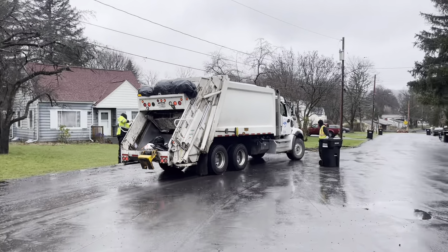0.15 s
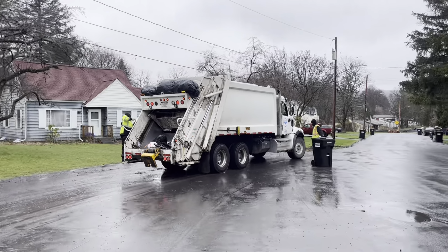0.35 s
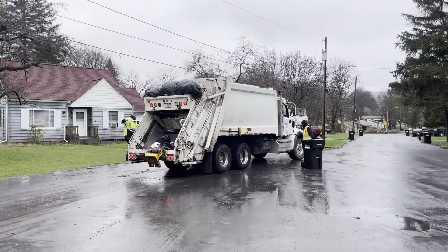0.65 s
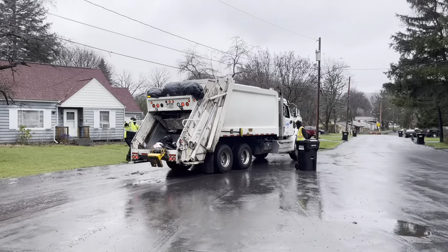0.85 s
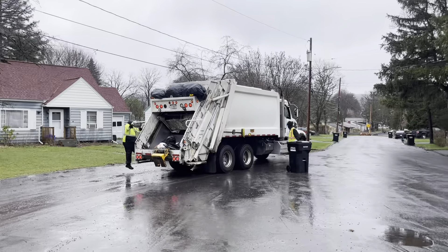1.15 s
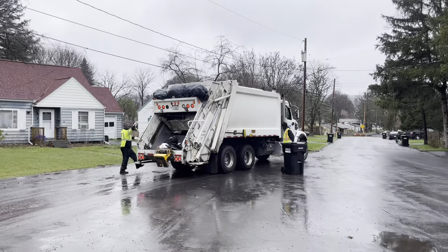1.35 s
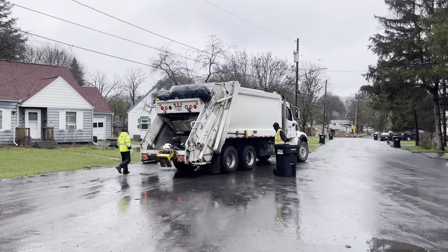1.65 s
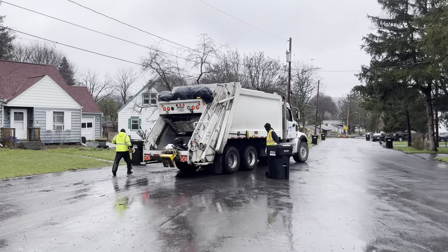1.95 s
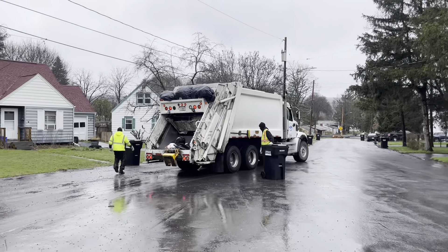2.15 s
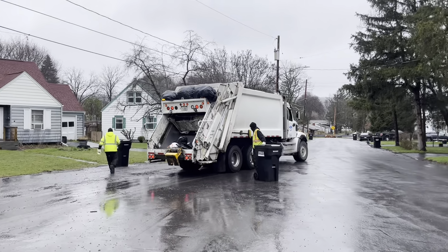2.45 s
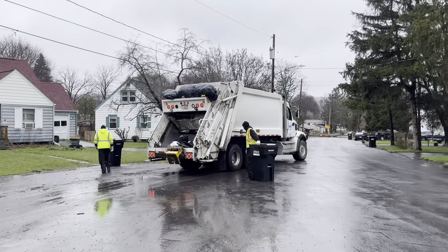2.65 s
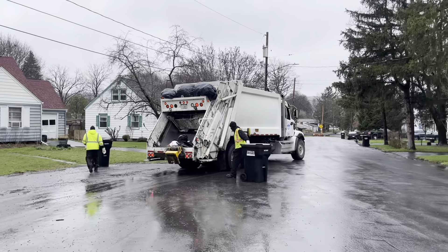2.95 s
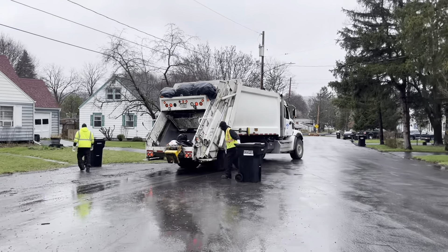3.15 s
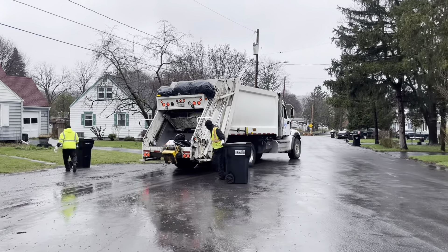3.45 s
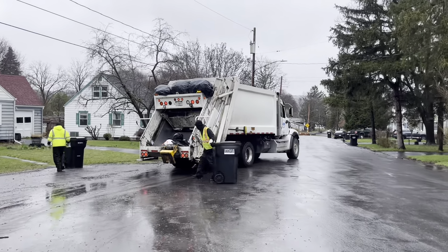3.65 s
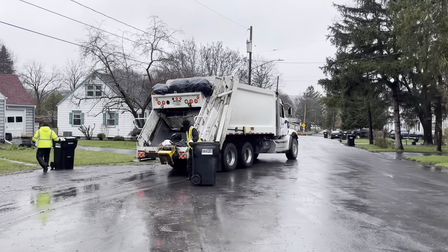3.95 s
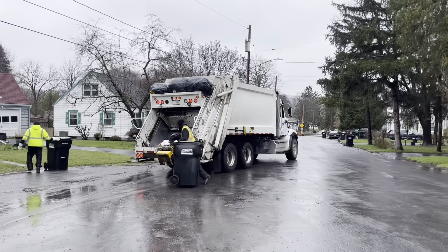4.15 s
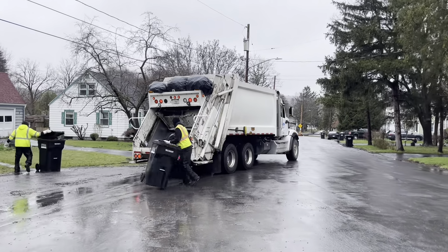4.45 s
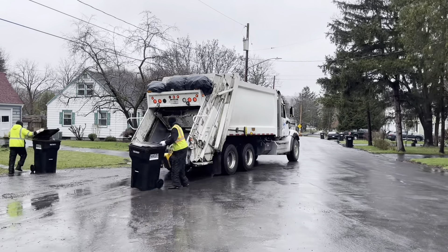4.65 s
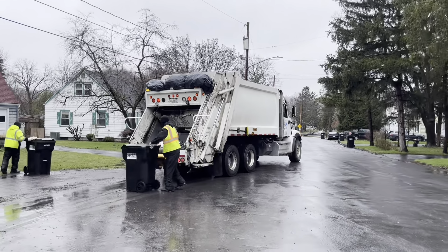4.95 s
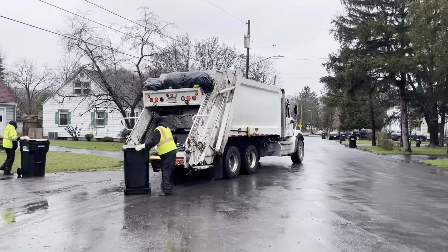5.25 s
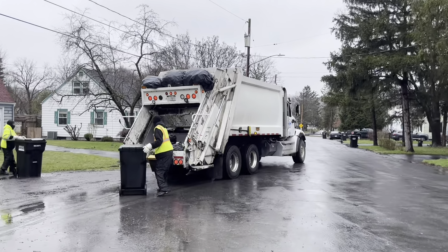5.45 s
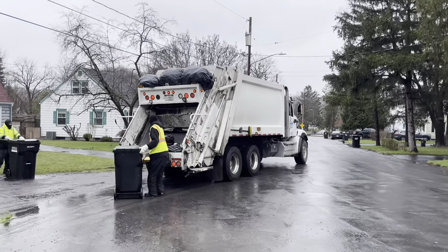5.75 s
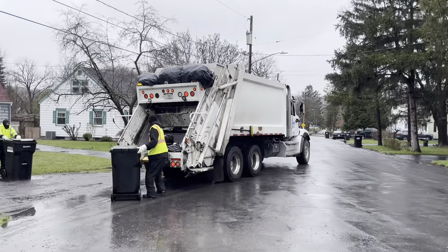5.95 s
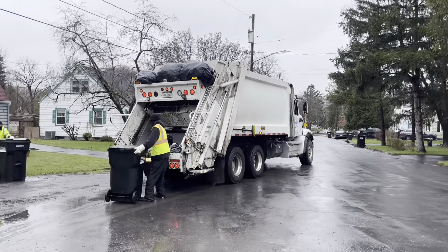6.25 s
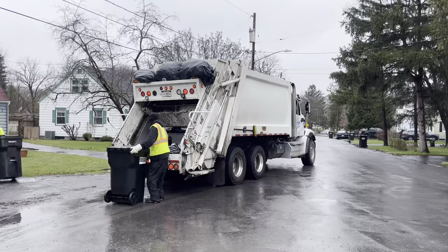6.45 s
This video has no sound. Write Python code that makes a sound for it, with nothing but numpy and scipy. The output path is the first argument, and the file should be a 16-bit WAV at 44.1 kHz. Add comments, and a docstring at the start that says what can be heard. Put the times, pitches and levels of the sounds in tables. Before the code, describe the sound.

High metallic brake squeals grow piercing over a low diesel clatter, give way to hollow plastic bin thuds, and end in a fading burst of air.

```python
"""Garbage truck squealing to a halt

A rear-loader creeps along a wet street, its diesel winding down to idle and its drum brakes squealing until it stops.
A wheeled bin rolls up on filtered grit and lands with hollow ringing knocks; a shaped hiss is the parking brake's air.
Firing bursts drive the engine's resonances, and wobbling tones make the squeals.
Low noise is a breeze buffeting a hand-held pair of closely spaced microphones."""
import sys
import numpy as np
from scipy import signal
from scipy.fft import rfft, irfft, next_fast_len
from scipy.io import wavfile
from scipy.ndimage import uniform_filter1d

SR = 44100
rng = np.random.default_rng(int(sys.argv[2]) if len(sys.argv) > 2 else 0)


def inscribe(sig):
    """Save sig as 16-bit PCM at rate SR to the path in sys.argv[1].

    A 1-D sig is mono; a 2-D sig holds one channel per row.
    Samples are clipped to [-1, 1] before scaling.
    """
    pcm = np.round(np.clip(np.atleast_2d(sig).T, -1, 1) * 32767)
    wavfile.write(sys.argv[1], SR, pcm.astype(np.int16))


N = 291942
TIME = np.arange(N) / SR

# All levels are relative: the sources trim them further. Colours are filter gains.
# breeze on the microphones: time_s, level_db
WIND_LEVEL = [(0.0, -28), (1.3, -29.5), (1.7, -23), (1.92, -29), (2.1, -32.5), (2.35, -44), (2.75, -51),
              (3.1, -39), (4.2, -33), (4.6, -29), (4.95, -23.5), (5.45, -26), (5.72, -33.5), (6.18, -31),
              (6.62, -31.5)]
# breeze colour: pitch_hz, gain_db
WIND_TONE = [(20, -42), (32, -18), (50, -5), (80, 2.5), (140, -2), (205, -6.5), (300, -12.5), (600, -24),
             (1000, -74)]

# wheels on asphalt: time_s, rumble_db
ROLL_LEVEL = [(0, -28), (0.7, -35.5), (2.5, -37.5), (3.3, -33.5), (3.62, -25.5), (4.12, -25), (4.28, -30.5),
              (4.55, -26.5), (4.8, -26.5), (5.5, -27), (6.62, -29)]
# rumble colour: pitch_hz, gain_db
ROLL_TONE = [(40, -42), (70, -28), (130, -2.5), (250, 0), (390, 2), (520, 1), (660, -6.5), (760, -9),
             (1000, -12.5), (1200, -18.5), (1700, -16.5), (2400, -63)]
# wet grit colour: pitch_hz, gain_db
GRIT_TONE = [(600, -8), (1100, 11), (2000, 4.5), (4500, -4.5), (6500, -1.5), (9000, -0.5), (13000, -9),
             (15500, -13)]
# louder grit where the bin is swung or dragged: top_s, half_width_s, level_db
GRIT_SCRAPES = [(3.25, 0.16, -41), (4.64, 0.2, -34.5), (4.97, 0.056, -33)]
GRIT_DB = -46  # steady crunch under the scrapes

# diesel clatter: time_s, level_db
CLATTER_LEVEL = [(0.0, -38), (0.6, -38), (2.0, -43.5), (3.2, -43.5), (3.6, -40), (5.4, -40)]
# clatter colour: pitch_hz, gain_db
CLATTER_TONE = [(25, -25), (60, 8), (200, -6), (400, -7), (600, -8.5), (740, -9.5), (1150, -14.5),
                (1600, -19.5), (2200, -16.5), (3900, -17.5), (6000, -25), (9000, -53)]
# panels and pipes that the engine sets ringing: pitch_hz, width_hz, level_db
BODY_RESONANCES = [(355, 100, 5.5), (554, 99, 9), (948, 166, 11.5), (1368, 130, 13.5), (1767, 58, 10)]
# diesel winding down to idle: time_s, firings_per_s
FIRING_RATE = [(0, 46), (0.2, 44), (0.5, 39.5), (0.9, 36.6), (2.0, 35.2)]
# exhaust note: multiple of the firing rate, level_db
EXHAUST_ORDERS = [(2, -4), (3, 0), (4, -1), (5, -1), (6, -8), (7, -9), (8, -11), (10, -4), (12, -7)]
# louder exhaust while the engine still turns fast: top_s, half_width_s, level_db
EXHAUST_SWELLS = [(0.25, 0.35, -34)]
EXHAUST_IDLE_DB = -49.5
# whine coming forward as the engine nears idle: top_s, half_width_s, level_db
ENGINE_WHINE_SWELLS = [(1.12, 0.22, -42)]
WHINE_ORDER, WHINE_DB = 10, -48  # multiple of the firing rate, steady level
# low hums and groans of the slowing truck: top_s, half_length_s, pitch_hz, level_db
TRUCK_HUMS = [(1.83, 0.073, 86.2, -28.5), (2.07, 0.074, 205, -33.5), (3.39, 0.36, 136.3, -29.5)]

# dull low thumps: start_s, level_db, pitch_hz, t60_s
LOW_THUMPS = [(1.096, 6, 85, 0.028), (1.487, 3.5, 71, 0.043), (1.597, -1, 85, 0.036),
              (4.36, -10.5, 100, 0.12), (4.803, 3.5, 77.6, 0.14), (4.87, -11, 76, 0.68),
              (5.034, -8, 79.6, 0.3), (5.19, -16, 80, 0.35), (5.3, -15.5, 75.6, 0.65),
              (6.149, -14, 81, 0.23), (6.53, 2.5, 100, 0.039)]
# sharp ticks of grit and metal: start_s, level_db, treble_db (added to the level)
SHARP_TICKS = [(0.138, -25, -25), (2.072, -30, -30), (4.529, -25.5, -10), (4.9275, -27, -12),
               (4.950, -32, 3), (5.017, -27, -24), (5.1348, -35, -3.5), (5.172, -30, -5)]

# plastic bin knocks: start_s, level_db, boom_db, crack_db (both added to the level), struck_wall_hz
BIN_BLOWS = [(3.932, -22, -16, -28, 510), (4.076, -18.5, -14, -24, 400), (4.801, -14, 0, -18, 444),
             (4.839, -10.5, -4, -20, 513), (4.848, -15.5, -12, -14, 950), (4.867, -27, -3, -19, 333),
             (4.956, -19, -12, -24, 511), (5.015, -11.5, -15, -3.5, 550), (5.033, -11, 2.5, -17, 340),
             (5.064, -19.5, 3, -18, 300), (5.099, -13, -4, -13, 400), (5.181, -19, 0, -7, 480),
             (5.207, -18, -2, -26, 420), (5.245, -18, -12, -18, 517), (5.299, -14.5, -5, -18, 500),
             (5.482, -13, 0, -19, 350), (6.559, -11.5, 0.5, -9, 720)]
# hollow bin resonances: pitch_hz, level_db, t60_s
HOLLOW_MODES = [(185.6, -10.5, 0.16), (256, -3, 0.14), (305, -8, 0.11), (346, -5, 0.059), (397, -2.5, 0.04),
                (481, -2, 0.056), (550, -2, 0.036), (705, 3.5, 0.01), (855, -14.5, 0.069),
                (1002, -8, 0.058), (1468, -7.5, 0.076)]
# bin chattering over rough patches and after it is dropped: top_s, half_width_s, level_db
CHATTER_SWELLS = [(3.62, 0.065, -30), (3.9, 0.08, -26), (4.09, 0.04, -28.5), (5.045, 0.02, -26)]

# parking brake hiss colour: pitch_hz, gain_db
AIR_TONE = [(500, -12), (1200, -11), (1800, -8), (2100, -9.5), (2900, -3.5), (3600, -4.5), (4700, -3),
            (5600, -4), (7000, -3), (8700, 2.5), (10500, -0.5), (13000, -2.5), (15500, -7)]
AIR_START_S, AIR_ATTACK_S, AIR_DB = 5.537, 0.037, -14.5
AIR_SAG_DB, AIR_SAG_POWER = 7.5, 1.57  # loss after one second, and the power of time it grows with

# brake squeals: start_s, top_s, end_s, top_pitch_hz, glide_hz_per_s, top_level_db
BRAKE_SQUEALS = [ (0.32, 0.41, 0.5, 9225, -600, -27.5), (0.39, 0.45, 0.53, 14400, 2500, -42),
                 (0.54, 0.58, 0.64, 7790, 200, -35), (0.7, 0.75, 0.8, 9085, -700, -33.5),
                 (0.74, 0.95, 1.23, 7730, -260, -33), (0.95, 1.01, 1.07, 7350, -800, -34),
                 (1.19, 1.3, 1.7, 9290, -330, -31.5), (1.64, 1.7, 1.76, 7800, 500, -36.5),
                 (1.75, 1.77, 1.95, 7500, -400, -38), (1.8, 1.88, 2.0, 9110, -500, -35),
                 (1.84, 1.88, 1.92, 13150, 0, -45), (1.96, 2.04, 2.09, 7370, -400, -33),
                 (1.99, 2.39, 2.44, 7750, 0, -33), (2.16, 2.28, 2.42, 9230, 600, -34),
                 (2.36, 2.41, 2.46, 6550, 500, -39), (2.43, 2.48, 2.57, 8030, 3600, -28),
                 (2.5, 2.59, 2.7, 6610, 300, -28), (2.55, 2.6, 2.66, 9760, 0, -38),
                 (2.44, 2.48, 2.8, 7420, -200, -39), (2.56, 2.64, 2.7, 8960, 0, -30),
                 (2.52, 2.6, 2.7, 8820, -400, -30), (2.54, 2.6, 2.78, 6720, 600, -34),
                 (2.65, 2.71, 3.1, 8020, 100, -32), (2.66, 2.88, 3.12, 11600, 300, -43),
                 (2.7, 2.8, 3.12, 8760, 100, -19), (2.7, 2.8, 2.9, 8980, 800, -29),
                 (2.74, 2.87, 3.14, 8410, 0, -25), (2.76, 2.8, 2.85, 5660, 0, -35),
                 (2.92, 2.99, 3.17, 5680, -300, -44), (2.96, 3.01, 3.09, 9750, -300, -39),
                 (2.97, 3.02, 3.07, 4575, 0, -47), (2.92, 3.15, 3.28, 7990, -400, -28),
                 (3.05, 3.1, 3.4, 9030, 0, -33), (3.12, 3.57, 4.25, 6945, 20, -32.5),
                 (3.2, 3.35, 3.82, 6756, -20, -26), (3.15, 3.19, 3.28, 9915, 0, -39),
                 (3.18, 3.27, 3.46, 8865, 250, -31), (3.21, 3.26, 3.4, 8680, -300, -32),
                 (3.4, 3.8, 4.0, 4785, 40, -51), (3.48, 3.62, 3.9, 14650, -100, -41),
                 (3.2, 3.24, 3.53, 8450, -400, -32), (3.26, 3.48, 3.72, 7926, 0, -19.5),
                 (3.28, 3.5, 4.3, 3692, 0, -48), (3.33, 3.4, 3.52, 7805, 50, -30),
                 (3.18, 3.56, 3.66, 7515, 60, -37), (3.52, 3.56, 3.8, 9075, -250, -28),
                 (3.53, 3.62, 3.72, 5735, 0, -39), (3.52, 3.77, 3.84, 6661, -130, -27),
                 (3.6, 3.65, 3.77, 8368, 0, -20.5), (3.76, 3.85, 3.96, 8930, 0, -34),
                 (3.74, 3.79, 4.02, 6378, 330, -27), (3.77, 3.86, 4.8, 7940, 22, -25),
                 (3.77, 3.85, 4.46, 8380, 130, -30), (3.76, 3.95, 4.12, 7825, 100, -30),
                 (3.83, 3.98, 4.1, 3970, 0, -39.5), (3.85, 3.95, 4.08, 5610, 0, -45),
                 (3.84, 3.95, 4.0, 7660, 0, -35), (3.96, 4.2, 4.66, 9033, 95, -21),
                 (4.24, 4.3, 4.75, 7847, 40, -32), (4.32, 4.6, 4.71, 6978, 80, -36),
                 (4.5, 4.68, 4.78, 4872, 60, -36.5), (4.61, 4.68, 4.78, 8932, 0, -25),
                 (4.62, 4.7, 4.85, 8810, 0, -35), (4.72, 4.8, 4.87, 11350, 0, -44),
                 (4.79, 4.9, 5.0, 9130, 1300, -26.5), (5.15, 5.3, 5.42, 10390, 280, -51), ]
# squeals that bend with the pressure on their lining, one curve each: time_s, pitch_hz, level_db
BENDING_CURVES = [
    [(2.64, 6330, -35), (2.74, 6390, -30), (2.79, 6455, -22), (2.9, 6480, -24), (3.05, 6460, -32),
     (3.15, 6405, -31), (3.3, 6385, -37)],
    [(3.03, 6330, -39), (3.3, 6260, -45), (3.58, 6280, -38.5), (4.4, 6278, -43), (4.6, 6305, -39),
     (4.71, 6334, -32), (4.9, 6400, -46)],
    [(4.45, 5650, -50), (4.65, 5640, -39), (4.78, 5645, -39), (4.83, 5660, -26), (4.9, 5700, -34),
     (4.96, 5720, -46)],
]
SWELL_DB, DIE_BACK_DB = 7.5, 9.5  # how far below its top a squeal starts and ends
GRIP_S, STOP_S = 2.64, 4.95  # the linings grip firmly from here until the truck stands
# pitch wobble while dragging lightly, the value it settles towards, and the time constant
DRAG_WOBBLE_HZ, SLOW_WOBBLE_HZ, SETTLE_S = 51, 5, 0.5
# weak, short squeaks of other drum modes: octaves either side, level lost at the far ends
STRAY_COUNT, STRAY_DB, STRAY_HALF_S = 70, -42, 0.15
STRAY_HZ, STRAY_OCTAVES, STRAY_FALL_DB = 8800, 0.8, 11

# microphone pair, phase: pitch_hz, left_lead_rad
PAIR_PHASE = [(520, 0), (950, .9), (1580, 2.0), (1760, .1), (2300, .1), (3000, .6), (4900, .7),
              (5450, -1.0), (6100, -.6), (7400, -2.1), (8000, -3.0), (8600, -3.25), (9200, -3.9),
              (12000, -6.28), (14400, -8.3), (15500, -9.4)]
# microphone pair, balance: pitch_hz, left_minus_right_db
PAIR_BALANCE = [(60, -0.5), (120, -0.2), (240, 1.2), (480, -2), (950, 0.9), (1890, 1.4), (3770, 3.5),
                (7520, 0.5), (15000, 0)]
CUTOFF_HZ = 15400


def from_db(db):
    """Decibels to a gain."""
    return 10 ** (np.asarray(db) / 20)


def rms_one(x):
    """Scale a sound to rms 1."""
    return x / np.sqrt(np.mean(x ** 2) + 1e-20)


def in_time(rows):
    """A curve of (time_s, value) at every sample."""
    return np.interp(TIME, *np.transpose(rows))


def at_hz(points, hz):
    """A table of (pitch_hz, value) read on a log-frequency axis."""
    known_hz, values = np.transpose(points)
    return np.interp(np.log(np.maximum(hz, 1)), np.log(known_hz), values)


def drift(rate):
    """Slow chance with a spread of 1, computed at every 20th sample."""
    r = np.exp(-40 * np.pi * rate / SR)
    noise = rng.standard_normal(N // 20 + 3002)
    slow = signal.lfilter([1], [1, -2 * r, r * r], noise)[3000:]  # skip the run-in
    return np.interp(np.arange(N) / 20, np.arange(len(slow)), rms_one(slow))


def coloured(x, spectrum):
    """A steady sound filtered by a colour; rms 1."""
    size = next_fast_len(N)
    hz = np.arange(size // 2 + 1) * SR / size
    return rms_one(irfft(rfft(x, size) * from_db(at_hz(spectrum, hz)), size)[:N])


def band(x, low_hz, high_hz):
    """A gentle band-pass."""
    edges = [low_hz, min(high_hz, SR * .45)]
    return signal.sosfilt(signal.butter(2, edges, "band", fs=SR, output="sos"), x + 1e-18)


def resonance(x, hz, width_hz):
    """A band-pass with gain 1 on top."""
    r = np.exp(-np.pi * width_hz / SR)
    feed = (1 - r * r) / 2 * np.array([1, 0, -1])
    return signal.lfilter(feed, [1, -2 * r * np.cos(2 * np.pi * hz / SR), r * r], x)


def ring(force, hz, t60):
    """A unit click sets a dying sine of height 1 ringing."""
    r, w = from_db(-60 / (t60 * SR)), 2 * np.pi * hz / SR
    return signal.lfilter([0, np.sin(w)], [1, -2 * r * np.cos(w), r * r], force + 1e-18)


def dying(times, levels_db, t60):
    """An envelope that jumps at each blow and dies away."""
    jumps = np.zeros(N)
    jumps[(np.asarray(times) * SR).astype(int)] = from_db(levels_db)
    return signal.lfilter([1], [1, -from_db(-60 / (t60 * SR))], jumps + 1e-18)


def burst_of_noise(times, levels_db, low_hz, high_hz, t60):
    """Each blow sets off a dying noise within one band."""
    noise = rng.standard_normal(N)
    bursts = band(noise * dying(times, levels_db, t60), low_hz, high_hz)
    return bursts / np.std(band(noise, low_hz, high_hz))


def grains(per_s, spread_db):
    """Random small contacts of uneven size."""
    sizes = from_db(spread_db * np.minimum(rng.exponential(1, N), 4)) * rng.choice([-1, 1], N)
    return sizes * (rng.random(N) < per_s / SR)


def swells(rows, steady_db):
    """Bell-shaped swells add their power to a steady level; a gain."""
    power = from_db(steady_db) ** 2
    for top_s, width_s, db in rows:
        bell = np.exp(-.5 * ((TIME - top_s) / width_s) ** 2)
        power = power + (from_db(db) * bell) ** 2
    return np.sqrt(power)


def rough_tone(cycles, rough, shake_rate=16):
    """A sine shaken in level and phase; rms 1."""
    shake = 1 + rough * (drift(shake_rate) + 1j * drift(shake_rate))
    return rms_one(np.real(shake * np.exp(2j * np.pi * (cycles + rng.random()))))


def wind(wind_db=1.0, gust_db=1.87):
    """Lumpy low turbulence: filtered noise with a restless level."""
    turbulence = coloured(rng.standard_normal(N), WIND_TONE)
    return turbulence * from_db(in_time(WIND_LEVEL) + wind_db + gust_db * drift(14.0))


def wheels(rumble_db=-1.5, lumpy_db=1.45):
    """Rough asphalt drums through the wheels while wet grit crunches under them."""
    rumble_level = from_db(in_time(ROLL_LEVEL) + rumble_db + lumpy_db * drift(9))
    rumble = coloured(grains(1000, 1.3), ROLL_TONE) * rumble_level
    grit = coloured(grains(7000, 2.1), GRIT_TONE) * swells(GRIT_SCRAPES, GRIT_DB)
    return rumble + grit * from_db(2.3 * drift(8.1))


def diesel(clatter_db=7.0, knock=0.12, uneven=0.45):
    """Firings send clatter through the body; uneven firing roughens every multiple of the exhaust note."""
    firing_hz = in_time(FIRING_RATE) * (1 + 0.0029 * drift(2.3))
    turns = np.cumsum(firing_hz) / SR  # counted in firings
    burst = np.exp(-4 * (turns % 1))
    pulse = rms_one(burst - burst.mean()) * (1 + 1.02 * drift(29))
    force = (1 + knock * pulse) * rng.standard_normal(N)
    body = force + sum(from_db(db) * resonance(force, hz, width_hz) for hz, width_hz, db in BODY_RESONANCES)
    clatter = coloured(body, CLATTER_TONE) * from_db(in_time(CLATTER_LEVEL) + clatter_db)
    exhaust = sum(from_db(db) * rough_tone(order * turns, uneven) for order, db in EXHAUST_ORDERS)
    exhaust = exhaust * swells(EXHAUST_SWELLS, EXHAUST_IDLE_DB)
    whine = rough_tone(WHINE_ORDER * turns, uneven / 2) * swells(ENGINE_WHINE_SWELLS, WHINE_DB)
    return clatter + exhaust + whine


def hum(width_hz=60):
    """Each hum is a rough, wandering tone in a band of rumble; it comes up, holds and fades."""
    out = np.zeros(N)
    for top_s, half_s, hz, db in TRUCK_HUMS:
        tone = rough_tone(np.cumsum(hz * (1 + .015 * drift(5))) / SR, .35)
        rumble = resonance(rng.standard_normal(N), hz, width_hz)
        rumble = rms_one(resonance(rumble, hz, width_hz))
        out += (tone + rumble) * from_db(db) * np.exp(-((TIME - top_s) / half_s) ** 4)
    return out


def thumps(rise_s=0.01, low_cut_hz=48):
    """Soft, heavy pushes that swing slowly and die away."""
    out = np.zeros(N)
    for start_s, db, hz, t60 in LOW_THUMPS:
        first = int(start_s * SR)
        age = TIME[:N - first]
        decay = from_db(db - 60 * np.minimum(age / t60, 4))
        out[first:] += decay * (1 - np.exp(-age / rise_s)) * np.sin(2 * np.pi * hz * age)
    return signal.sosfilt(signal.butter(4, low_cut_hz, "high", fs=SR, output="sos"), out)


def ticks(clink_db=-6.0, crack_db=5.5):
    """Each tick is a short clink of noise with a bright crack on top."""
    start_s, db, treble = np.transpose(SHARP_TICKS)
    clink = rms_one(band(rng.standard_normal(N), 1300, 4300))
    clink = clink * dying(start_s, db + clink_db, t60=0.063)
    crack = rms_one(band(rng.standard_normal(N), 7000, 11000))
    return clink + crack * dying(start_s, db + treble + crack_db, t60=.03)


def bin_chatter(low_hz=290, high_hz=1100):
    """A dense run of small jolts keeps the bin's middle modes ringing."""
    jolts = grains(900, 1.3)
    rings = sum(from_db(db) * ring(jolts * rng.standard_normal(N), hz, t60) for hz, db, t60 in HOLLOW_MODES)
    return rms_one(band(rings, low_hz, high_hz)) * swells(CHATTER_SWELLS, -np.inf)


def bin_knocks(body_db=-0.5, focus_db=5.5, boom_db=-5.0, crack_db=-4.5, rattle_db=-13.5, rebound_db=-5.0):
    """Blows ring the modes, most those near the struck wall's pitch, with a crack, a hollow boom and a rattle."""
    start_s, db, boom, crack, wall_hz = np.transpose(BIN_BLOWS)
    # the loose lid and axle strike twice more, within 18 ms
    strike = np.arange(3)
    contacts = start_s[:, None] + strike * rng.uniform(0.00372, .009, (len(start_s), len(strike)))
    at = np.minimum((contacts * SR).astype(int), N - 1)
    out = np.zeros(N)
    for hz, mode_db, t60 in HOLLOW_MODES:
        force = np.zeros(N)
        # focus_db is lost per octave from the struck wall's pitch
        blow_db = db + mode_db + body_db - focus_db * np.abs(np.log2(hz / wall_hz))
        contact_db = blow_db[:, None] + rebound_db * strike + rng.normal(0, 0.99, at.shape)
        force[at] = from_db(contact_db) * rng.choice([-1, 1], at.shape)
        out += ring(force, hz, t60)
    out += burst_of_noise(start_s, db + boom + boom_db, 81, 240, t60=0.13)
    out += burst_of_noise(start_s, db + crack + crack_db, 640, 1670, t60=0.048)
    return out + burst_of_noise(start_s, db + rattle_db, 224, 980, t60=0.22)


def air_brake(thinning=0.29, low_jet_hz=5500):
    """A jet from the opening valve sags ever faster as the chambers empty, its lower roar before its top hiss."""
    age = np.maximum(TIME - AIR_START_S, 0)
    jet = coloured(rng.standard_normal(N), AIR_TONE)
    sag_db = -AIR_SAG_DB * age ** AIR_SAG_POWER
    roar = signal.sosfiltfilt(signal.butter(2, low_jet_hz, fs=SR, output="sos"), jet)
    jet = jet + roar * (from_db(thinning * sag_db + 2.5) - 1)
    opening = np.sin(np.pi / 2 * np.minimum(age / AIR_ATTACK_S, 1)) ** 2
    return jet * from_db(AIR_DB + sag_db + 0.52 * drift(30)) * opening


def squeal(rows, wobble_hz, fade_s=0.02, flutter_db=2.5, surge_db=2.0, octave_db=-22.0, middle_hz=7500):
    """Friction sustains a drum mode; uneven contact shakes level and pitch, high modes most, plus an octave."""
    s, hz, db = np.transpose(rows)
    first, last = max(int((s[0] - fade_s) * SR), 0), int((s[-1] + fade_s) * SR)
    t = TIME[first:last]
    shake = rms_one(band(rng.standard_normal(len(t)), 33.5, 150))
    sway = drift(7.86)[first:last]
    wobble = wobble_hz[first:last] * hz.mean() / middle_hz  # in proportion to pitch
    pitch = np.interp(t, s, hz) + wobble * (shake + 0.5 * sway)
    phase = 2 * np.pi * np.cumsum(pitch) / SR
    to_edge = np.minimum(t - t[0], t[-1] - t)
    edge = np.clip(to_edge / (2 * fade_s) + .5, 0, 1) ** 2 * np.clip(to_edge / fade_s, 0, 1)
    flutter = rms_one(band(rng.standard_normal(len(t)), 9.4, 35.4))
    level = edge * from_db(np.interp(t, s, db) + flutter_db * flutter + surge_db * sway)
    out = np.zeros(N)
    out[first:last] = np.sqrt(2) * level * (np.sin(phase) + from_db(octave_db) * np.sin(2 * phase))
    return out


def stray_squeaks(wobble_hz):
    """Weak modes catch at random and let go again; those far from the main squeals' pitch are faintest."""
    out = np.zeros(N)
    for when, pitch, length, bend in rng.uniform(-1, 1, (STRAY_COUNT, 4)):
        # the power crowds them towards the first grip
        top_s = GRIP_S + (STOP_S - GRIP_S - 2 * STRAY_HALF_S) * ((when + 1) / 2) ** 1.5
        hz = STRAY_HZ * 2 ** (STRAY_OCTAVES * pitch)
        db = STRAY_DB - STRAY_FALL_DB * abs(pitch)
        glide_hz = bend * wobble_hz[int(top_s * SR)]
        half_s = STRAY_HALF_S * 2 ** length
        shape = [(top_s + k * half_s, hz + k * glide_hz, db - SWELL_DB * abs(k)) for k in (-1, 0, 1)]
        out += squeal(shape, wobble_hz)
    return out


def friction_mix(x, square_db=-23.0, cube_db=-40.0):
    """Friction is not linear: modes that sound together breed weak sum and difference tones."""
    level = np.sqrt(np.abs(uniform_filter1d(x * x, SR // 25)) + 1e-12)
    swing = x / level
    bred = from_db(square_db) * swing * swing + from_db(cube_db) * (swing * swing - 2) * swing
    return x + band(level * bred, 2850, 7400)


def brakes(squeal_db=-1.0, bending_db=-1.0, bending_wobble=0.34):
    """Light drag gives short squeals; firm grip locks modes into longer ones, steadying as the wheels slow."""
    settling = np.exp(-np.maximum(TIME - GRIP_S, 0) / SETTLE_S)
    wobble_hz = SLOW_WOBBLE_HZ + (DRAG_WOBBLE_HZ - SLOW_WOBBLE_HZ) * settling
    out = from_db(bending_db) * sum(squeal(curve, bending_wobble * wobble_hz) for curve in BENDING_CURVES)
    for start, top, end, hz, glide, db in BRAKE_SQUEALS:
        # swell to the top and die back while the pitch glides evenly
        shape = [(start, db - SWELL_DB), (top, db), (end, db - DIE_BACK_DB)]
        curve = [(s, hz + glide * (s - top), level_db) for s, level_db in shape]
        out += from_db(squeal_db) * squeal(curve, wobble_hz)
    return friction_mix(out + stray_squeaks(wobble_hz))


def street(x, t60, wet_db):
    """Scattered echoes from houses and trees, different in each ear."""
    age = TIME[:SR // 2]
    tail = rng.standard_normal((2, len(age))) * from_db(-60 * age / t60)
    tail = tail * (age > .012)  # a gap before the first echo
    tail /= np.sqrt(np.sum(tail ** 2, axis=1, keepdims=True))
    return from_db(wet_db) * signal.fftconvolve(x[None], tail, axes=1)[:, :N]


def microphones(x):
    """The two ports differ in phase and level from pitch to pitch, half the difference on each side."""
    size = next_fast_len(N + SR // 10)
    hz = np.arange(size // 2 + 1) * SR / size
    half = np.exp(.5j * at_hz(PAIR_PHASE, hz)) * from_db(at_hz(PAIR_BALANCE, hz) / 2)
    return irfft(rfft(x, size) * np.array([half, 1 / half]), size)[:, :N]


def scene():
    """Truck, bin and breeze through the microphone pair, with echoes from the street."""
    engine = diesel() + hum()
    squeals = brakes()
    work = wheels() + bin_chatter() + bin_knocks() + thumps() + ticks() + air_brake()
    direct = microphones(engine + squeals + work + wind())
    echoes = street(engine, t60=0.25, wet_db=-6.0)
    echoes = echoes + street(squeals, t60=0.14, wet_db=-12.0)
    echoes = echoes + street(work, t60=0.2, wet_db=-17.0)
    # a second breeze, opposite in the two channels, widens the buffeting
    wide_wind = from_db(-15.5) * wind() * [[1], [-1]]
    return direct + echoes + wide_wind


def record(dry):
    """The highest peaks are rounded and the top is cut steeply."""
    rounded = dry / (1 + (dry / .92) ** 6) ** (1 / 6)
    return signal.sosfilt(signal.ellip(10, .1, 80, CUTOFF_HZ, fs=SR, output="sos"), rounded)


dry = scene()
out = record(dry)
inscribe(out)
```